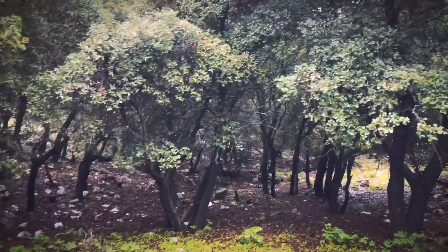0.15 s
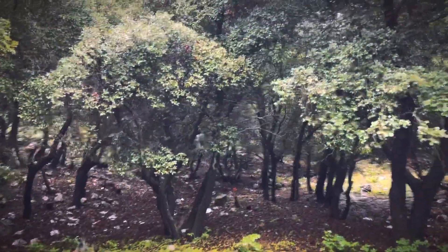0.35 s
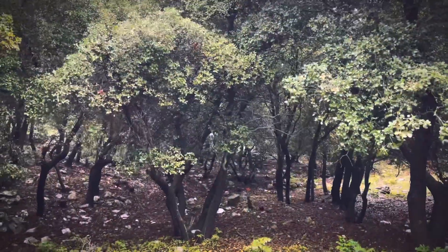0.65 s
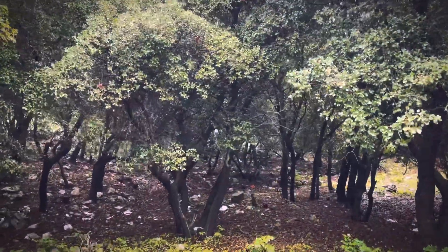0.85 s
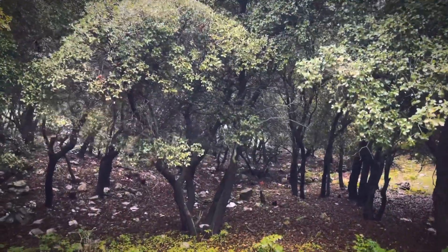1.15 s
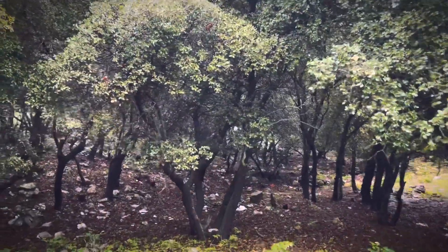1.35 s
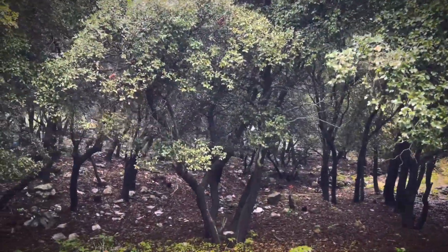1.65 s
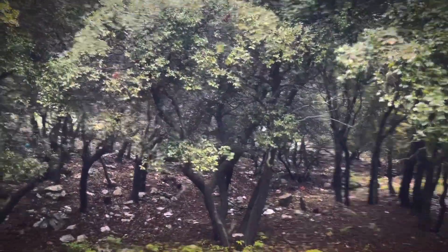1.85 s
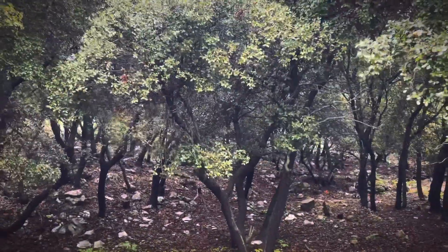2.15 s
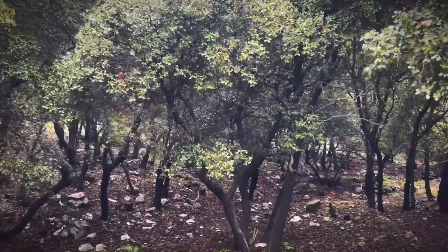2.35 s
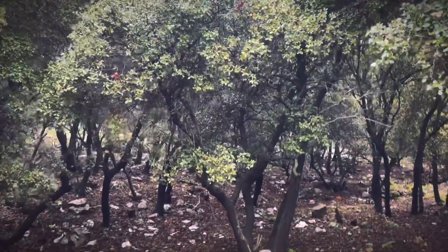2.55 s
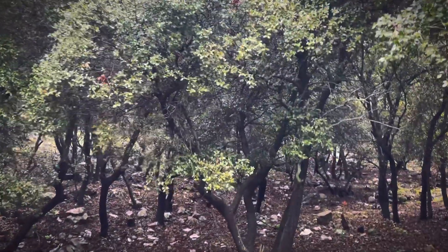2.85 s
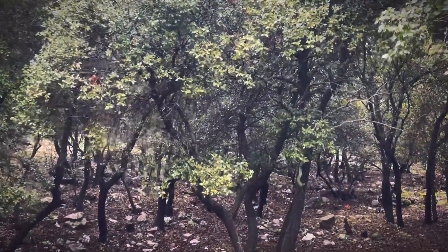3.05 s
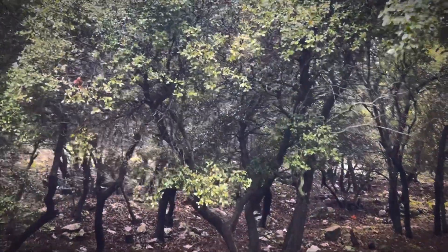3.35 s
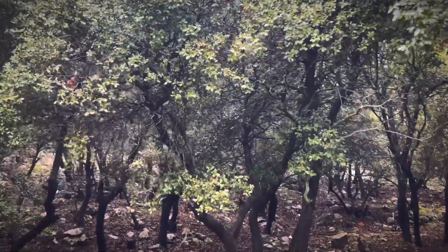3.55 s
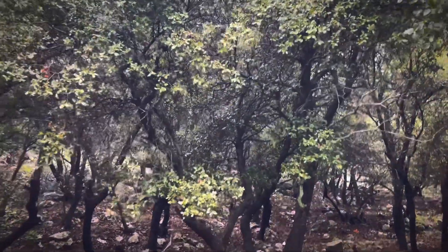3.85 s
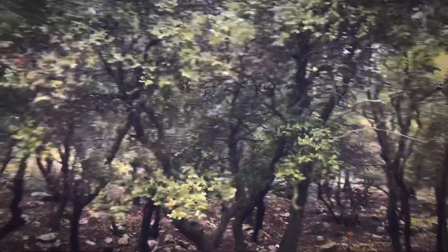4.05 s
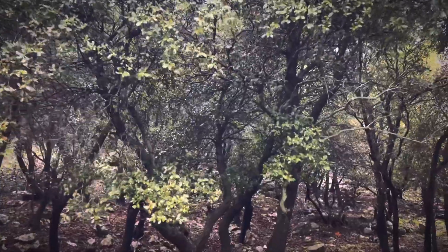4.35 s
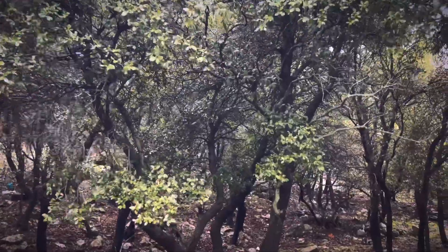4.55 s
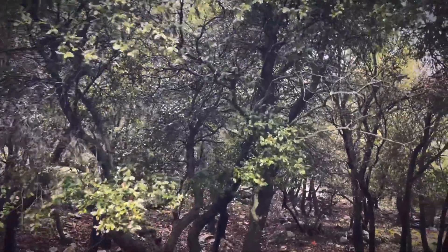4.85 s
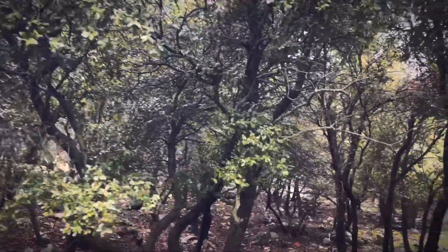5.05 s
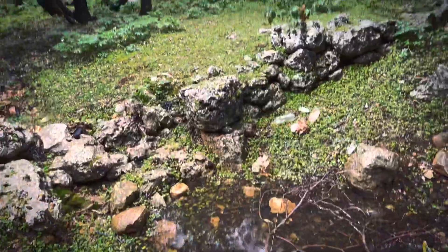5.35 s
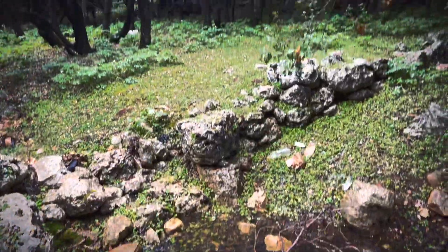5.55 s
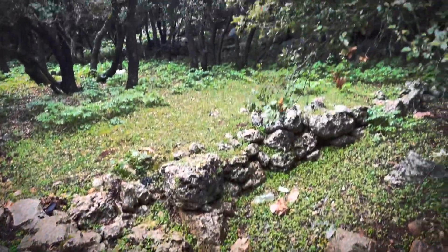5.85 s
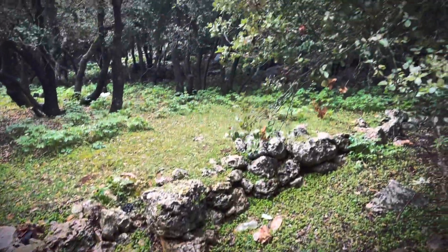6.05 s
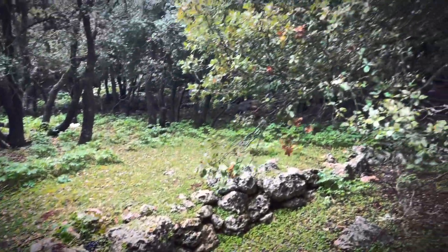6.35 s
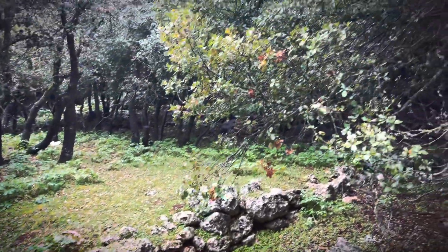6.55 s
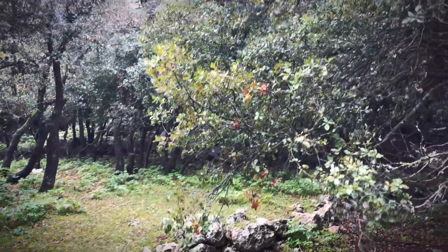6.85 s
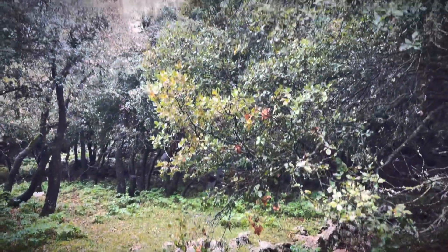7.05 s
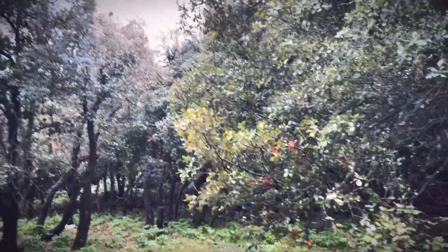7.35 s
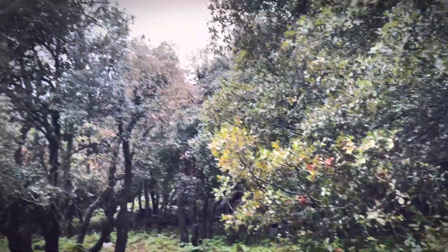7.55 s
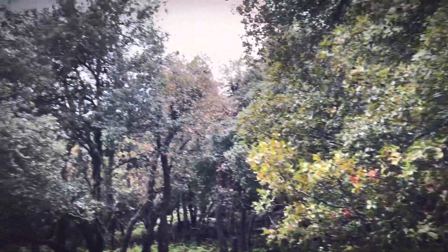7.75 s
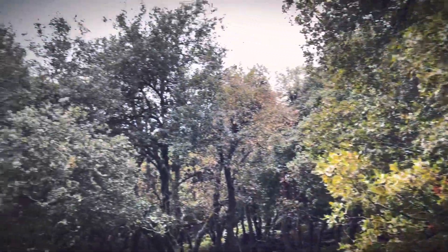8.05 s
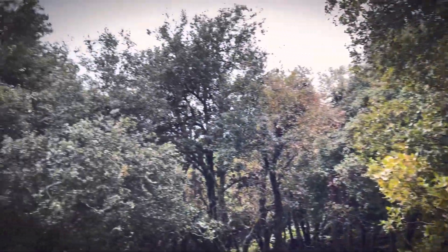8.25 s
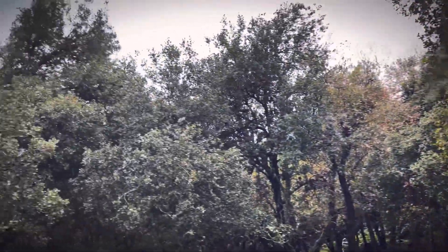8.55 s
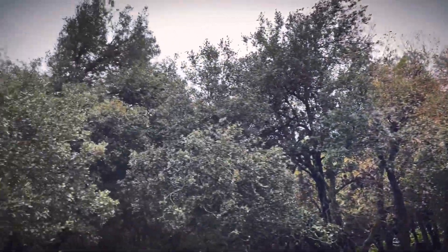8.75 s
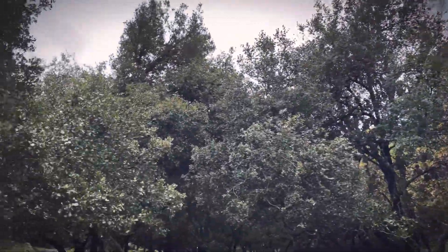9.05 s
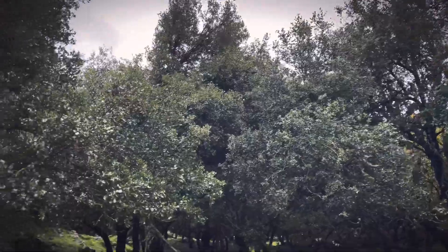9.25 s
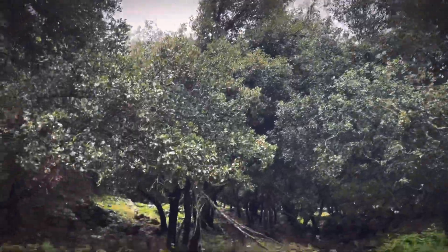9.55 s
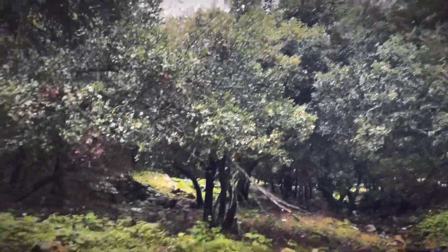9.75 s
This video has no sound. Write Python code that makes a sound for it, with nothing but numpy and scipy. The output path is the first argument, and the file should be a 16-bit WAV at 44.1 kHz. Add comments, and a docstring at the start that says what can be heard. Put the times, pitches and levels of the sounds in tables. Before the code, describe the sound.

Light rain in a wood, heard close from a hand-held microphone. A patchy, bright hiss on leaves runs throughout, grained with small drops and crisp near ticks. Very thin, high bird notes chirp in the first 0.3 s. Heavy drips hit the microphone housing as short, hollow, damped thumps around 0.2-0.4, 0.9 and 1.9 s, strongest near 2.45, 3.3 and 4.15 s, with spatter and low grip rumble, notably at 4.1 s. Bright wet plops sound near 4.95 s. At 5.23 s everything drops out for an instant. From 5.5 to 6.5 s a near bird, left of centre, gives mellow sliding whistles with a tiny trill, echoing softly off trunks. More thumps come at 6.75-7.25 s. From 6.6 s to the end, fainter higher birds twitter in quick rising and falling slurs, with a few hoarse chirrups before 7.1 s. The rain thins; a last cluster of weaker drips falls near 9.6 s.

```python
"""Light rain in an oak wood: heavy drips excite the damped modes of a hand-held microphone housing,
near drops tick as splash plus resonance, and countless far drops merge into a hiss of filtered noise.
The housing hums under drizzle and rumbles in the grip. Birds, sung as gliding sines left of centre
or in the centre, return from the trunks as diffuse echoes; hazy narrow bands of noise swell and fade.
The sound drops out for a moment in the middle."""
import sys
import numpy as np
from scipy import signal
from scipy.fft import rfft, irfft
from scipy.io import wavfile

SR = 44100
rng = np.random.default_rng(int(sys.argv[2]) if len(sys.argv) > 2 else 0)


def wav_out(sig):
    """Save sig, one row per channel (or a flat mono array), as 16-bit PCM at SR to the path in sys.argv[1]."""
    wavfile.write(sys.argv[1], SR, np.round(np.clip(np.atleast_2d(sig).T, -1, 1) * 32767).astype(np.int16))


N = 436590

# Course of the rain. Each row: time in seconds, mean hum of the housing in dB, rain on leaves in dB.
RAIN_COURSE = [(0.0, -61.5, -54.5), (.38, -62.5, -61), (.46, -62.5, -56.5), (1.0, -65, -57),
               (1.68, -66.5, -59), (1.98, -60.5, -55.5), (2.2, -59, -57.5), (2.95, -66.5, -57),
               (3.4, -63.5, -57), (4.08, -60, -58.5), (4.44, -64.5, -60.5), (4.57, -73, -57),
               (4.66, -58.5, -54.5), (5.3, -64.5, -60.5), (5.8, -64, -60.5), (6.3, -57, -59),
               (7.0, -66.5, -63), (7.5, -78.5, -64.5), (8.24, -67, -63), (8.9, -72.5, -61.5),
               (9.9, -65.5, -63)]
# Rumble of the grip. Each row: time in seconds, mean level in dB.
GRIP_COURSE = [(0.0, -80.5), (.33, -58), (.69, -74.5), (1.0, -76.5), (1.71, -77.5), (1.98, -71.5),
               (2.65, -62.5), (3.1, -83), (3.3, -62), (3.69, -82.5), (4.08, -50), (4.44, -73.5),
               (6.4, -67.5), (7.05, -57.5), (7.42, -82), (9.68, -78)]
# Spectra of rain on leaves as the microphone colours it, of the housing's hum and of the grip's rumble.
# Each row: frequency in Hz, relative density in dB.
HISS_SPECTRUM = [(880, -44), (1500, -3.5), (3120, -4.5), (5070, -1.5), (5600, -12.5), (6000, -4),
                 (6560, -2), (7460, -7.5), (9100, -10), (11800, 4), (14100, -12), (14900, -15.5),
                 (16000, -48)]
HUM_SPECTRUM = [(71, -47), (120, -27), (220, -32), (300, 1.5), (653, 3.5), (773, 12.5), (955, 10.5),
                (1150, 5.5), (3500, -6.5), (4550, -14), (7700, -120)]
RUMBLE_SPECTRUM = [(12, -58), (20, -44), (43, 7), (91, 10), (130, 2.5), (216, 6), (300, -3), (390, -20),
                   (660, -120)]
# Heavy drips on the housing. Each row: start in seconds, level in dB before the mode gains,
# favoured pitch in octaves above the lowest mode.
KNOCKS = [(.215, -28.5, 2.1), (0.286, -37, 2.7), (0.368, -25.5, 1.87), (.792, -36, 0.91), (0.9, -25, 2.15),
          (0.935, -20, 0.86), (1.046, -37.5, .05), (1.84, -28.5, 1.95), (1.875, -27, 1.04),
          (1.931, -30, 2.07), (2.387, -29.5, 1.3), (2.431, -21, 2.17), (2.454, -8.5, 2.3),
          (2.607, -26.5, 0.78), (2.639, -30, 2.5), (2.685, -30.5, 2.13), (2.742, -37, 0.045),
          (2.816, -34, 2.7), (3.29, -27.5, 1.87), (3.315, -7, 2.16), (3.839, -30, 1.9), (3.943, -28, 2.03),
          (4.127, -21.5, 0.13), (4.15, -9, 2.6), (4.22, -18.5, 1.15), (4.774, -32.5, 0.91),
          (5.006, -38, 0.06), (5.275, -41.5, 0.82), (5.319, -41, 0.6), (6.244, -30, 1.25),
          (6.555, -25, 1.86), (6.748, -16.5, 2.02), (6.79, -25.5, 1.93), (6.817, -17.5, 1.43),
          (7.077, -9, 1.69), (7.21, -28, 2.4), (7.25, -13.5, 2.11), (7.506, -29.5, 1.76),
          (7.603, -38, 1.76), (8.547, -25.5, 1.77), (9.529, -35.5, 2.7), (9.541, -27, 1.83),
          (9.562, -30, 1.9), (9.607, -20, 1.98), (9.668, -43, 1.2), (9.777, -45, 0.81)]
# Modes of the housing. Each row: mean frequency in Hz, relative level in dB, decay by 60 dB in seconds.
HOUSING_MODES = [(140.2, -0.5, 0.07), (220.4, -1.75, 0.069), (304, -4, 0.032), (404, -1.6, 0.042),
                 (515.6, -5.5, 0.029), (770, -3, 0.028), (921, 0.5, 0.04), (1250, 0, 0.024)]
# Near drops on leaves and stones. Each row: start in seconds, peak of the ring in dB, pitch in Hz.
TICKS = [(.088, -56, 3700), (.133, -62, 4280), (0.169, -48, 9700), (0.3394, -55, 4840), (0.427, -37, 10900),
         (0.505, -47, 4760), (0.68, -42, 12700), (0.743, -49, 1940), (.812, -58, 1400), (0.903, -41, 1850),
         (1.0634, -41, 1250), (1.08, -54, 1500), (1.119, -45, 1310), (1.224, -51, 1250), (1.332, -46, 5170),
         (1.332, -48, 2000), (1.389, -45, 11800), (1.4327, -36.5, 1300), (1.481, -38.5, 12700),
         (1.9638, -52, 11300), (2.365, -36.5, 12300), (2.493, -39, 10800), (2.573, -28, 1560),
         (2.598, -30.5, 1350), (2.679, -42, 1510), (2.722, -40, 3570), (3.344, -34, 1590),
         (3.5169, -38.5, 3220), (3.523, -38, 3660), (3.7488, -37, 6440), (3.934, -40.5, 1220),
         (4.122, -51, 5000), (4.153, -28.5, 1550), (4.206, -39, 1580), (4.2287, -35.5, 1450),
         (4.3, -37.5, 1440), (4.3999, -36.5, 1380), (4.436, -51, 4700), (4.621, -57, 11400),
         (4.769, -35, 2000), (4.862, -47, 1420), (4.8945, -35.5, 3800), (4.917, -40, 11400),
         (4.957, -25, 2710), (4.96, -23.5, 1275), (5.123, -50, 11000), (5.466, -40, 12600),
         (6.3634, -30, 4300), (6.54, -45, 6640), (6.747, -49, 2870), (6.817, -51, 4950), (7.216, -52, 4900),
         (7.5052, -56, 2830), (7.7321, -39.5, 4480), (7.734, -48, 3270), (7.972, -58, 4100),
         (8.363, -54, 4500), (8.544, -44, 3900), (8.757, -58, 5260), (8.825, -55, 4900),
         (9.6045, -45, 2040)]
# Crackle of water shaken from a branch. Each row: middle in seconds, length in seconds, level in dB.
FLURRIES = [(0.336, 0.099, -58), (1.137, 0.31, -63.5), (1.452, 0.13, -65.5), (1.898, 0.22, -56),
            (2.644, 0.29, -61), (3.927, 0.24, -58.5), (4.267, 0.14, -53), (9.557, 0.083, -63.5)]
# Notes of the near bird. Each row: start in seconds, length in seconds, initial offset of the slide in Hz,
# first pitch in Hz, last pitch in Hz, level in dB before shaping and flutter.
NEAR_BIRD_NOTES = [(5.476, .064, -200, 2270, 2250, -56), (5.606, 0.032, -49, 1700, 1820, -56.5),
                   (5.652, 0.056, -27, 1550, 1830, -49), (5.697, 0.033, -250, 2148, 2110, -35),
                   (5.825, 0.12, 178, 1792, 1618, -41), (6.037, 0.0615, 475, 1856, 2010, -40),
                   (6.168, 0.12, 338, 2006, 1937, -40), (6.443, 0.073, -22, 2100, 2420, -57.5)]
# Notes of further birds. Each row: start in seconds, length in seconds, first pitch in Hz,
# last pitch in Hz, level in dB before shaping and flutter.
SONG_NOTES = [(5.55, 0.043, 3820, 3920, -73), (5.76, 0.052, 3900, 3950, -72),
              (6.58, 0.048, 3660, 3600, -73), (6.624, 0.028, 3450, 3080, -73),
              (6.689, 0.06, 3430, 4680, -64), (6.847, 0.012, 4600, 4620, -67),
              (6.889, 0.027, 4030, 3925, -64), (6.9, 0.019, 3880, 2940, -67),
              (6.955, 0.012, 4600, 4570, -66), (6.99, 0.02, 5800, 5780, -72),
              (6.999, 0.038, 3930, 3330, -67), (7.043, 0.014, 4100, 5000, -66),
              (7.133, 0.037, 5060, 5200, -74), (7.136, 0.029, 2780, 3390, -72),
              (7.203, 0.1, 4190, 3710, -66.5), (7.378, 0.034, 3380, 3440, -72),
              (7.534, 0.037, 5200, 5400, -73), (7.62, 0.027, 4350, 4140, -75),
              (7.657, 0.017, 4250, 4300, -74.5), (7.675, 0.02, 3380, 3400, -73),
              (7.697, 0.031, 3980, 4090, -70.5), (7.851, 0.054, 3960, 3920, -77),
              (7.876, 0.062, 4350, 5200, -74), (8.031, 0.084, 3890, 5080, -69.5),
              (8.215, 0.041, 4440, 3450, -73), (8.37, 0.044, 4420, 3510, -66),
              (8.506, 0.105, 3220, 4600, -68), (8.528, 0.17, 3920, 3920, -72),
              (8.702, 0.09, 3500, 4650, -63), (8.869, 0.065, 3600, 3130, -67),
              (8.934, .21, 3940, 3920, -69.5), (8.951, 0.018, 4850, 4400, -65),
              (9.047, 0.056, 3590, 3130, -63.5), (9.109, 0.027, 5550, 5500, -75),
              (9.292, 0.049, 3440, 3680, -61.5), (9.388, 0.075, 4044, 3980, -72),
              (9.49, 0.049, 3610, 3020, -67), (9.78, 0.23, 3940, 4000, -70.5)]
# Notes of a thin high bird. Each row: start in seconds, length in seconds, first, middle and last pitch
# in Hz, level in dB before flutter.
HIGH_BIRD_NOTES = [(0.011, 0.031, 6850, 7800, 6950, -64), (.06, 0.018, 6900, 7050, 7200, -72),
                   (0.126, 0.062, 7000, 5920, 4840, -59.5), (0.212, 0.034, 6400, 7900, 7040, -60),
                   (.263, 0.016, 7120, 7170, 7240, -62.5)]
# Short hoarse chirrups. Each row: start in seconds, length in seconds, central pitch in Hz,
# level in dB before flutter.
CHIRRUPS = [(5.568, 0.022, 2860, -62), (5.801, 0.013, 2690, -54.5), (6.774, 0.024, 2840, -57.5),
            (7.057, 0.017, 2760, -55)]
# Hazy narrow bands of sound, distant calls or lingering echo. Each row: middle in seconds,
# length in seconds, pitch in Hz, peak level in dB.
HAZES = [(5.57, 0.21, 2180, -64), (6.66, 0.22, 1670, -56.5), (7.974, 0.34, 1596, -60.5)]

NEAR_BIRD_PAN_DB, SONG_PAN_DB = 7.5, 7   # left above right
WOOD_T60_S, NEAR_ECHO_DB = 0.5, -8
TWIGS_T60_S, TWIGS_DB = 0.08, -1   # near twigs smear the further voices
THIN_T60_S = 0.36   # high voices die sooner among the leaves
SONG_ECHO_DB, HIGH_ECHO_DB, CHIRRUP_ECHO_DB = -1.5, 1.5, -9
SLIDE_S, ATTACK_S, RELEASE_S = 0.0131, 0.011, 0.008   # slide is a time constant
TRILL_S, PIP_GAP_S, PIP_S = 5.754, 0.019, 0.016   # start, spacing of starts, length
TRILL_HZ, TRILL_SAG_HZ, TRILL_DB = 2010, 22, -42   # four pips, each lower
HIGHER_LOUDER_DB = 1.5   # per kHz within a note
GLIDE_DIP_DB, DWELL = 3.0, 0.17   # dip at mid-note per kHz of glide; share of the note held at each end
SPLASH_DB, SPLASH_FOLLOWS = -19, 0.5   # splash peak, and how much of the drop's level it follows
FALL_BELOW_DB, FALL_ABOVE_DB = 15, 13   # per octave: modes off the favoured pitch ring weaker
MOST_FALL_DB = 21   # limit of that weakening
UNEVEN_DB = 1.5   # chance in the strength of each mode
DROPOUT_S, DROPOUT_WIDTH_S, DROPOUT_DB = 5.232, 0.012, 43   # middle, half width, depth
CUTOFF_HZ = 16300


def from_db(db):
    """A level in dB is the logarithm of an amplitude ratio."""
    return 10 ** (np.asarray(db) / 20)


def rms_one(x):
    """Normalisation to unit root mean square."""
    return x / np.sqrt(np.mean(x ** 2) + 1e-20)


def in_time(rows):
    """Linear interpolation carries each column through time."""
    s, *columns = np.transpose(rows)
    return [np.interp(np.arange(N) / SR, s, c) for c in columns]


def drift(rate):
    """Low-passed noise: slow chance with spread 1, quicker for a higher rate in Hz."""
    r = np.exp(-80 * np.pi * rate / SR)   # one step spans 40 samples
    noise = rng.standard_normal(N // 40 + 2002)
    slow = signal.lfilter([1], [1, -2 * r, r * r], noise)[2000:]
    return np.interp(np.arange(N) / 40, np.arange(len(slow)), rms_one(slow))


def coloured(x, spectrum):
    """Spectral weighting: multiplication by gains in the frequency domain; rms 1."""
    hz, db = np.transpose(spectrum)
    grid = np.arange(N // 2 + 1) * SR / N + 1
    gain = from_db(np.interp(np.log(grid), np.log(hz), db))
    return rms_one(irfft(rfft(x) * gain, N))


def ring(clicks, hz, t60):
    """Damped resonance: a unit click sets a decaying sine of height 1 ringing."""
    r = from_db(-60 / (t60 * SR))
    w = 2 * np.pi * min(hz, 0.45 * SR) / SR
    return signal.lfilter([0, np.sin(w)], [1, -2 * r * np.cos(w), r * r], clicks + 1e-18)


def add(track, s, sound):
    """Superposition: a short sound joins the track at its time."""
    i = max(round(s * SR), 0)
    track[..., i:i + sound.shape[-1]] += sound[..., :N - i]


def whistle(t, hz, level_db, pan_db):
    """Phase is the integral of frequency: a near-sine note with soft ends, panned by level."""
    fade = np.clip(np.minimum(t - t[0], t[-1] - t) / 0.00033, 0, 1)
    note = np.sqrt(2) * from_db(level_db) * fade * np.sin(2 * np.pi * np.cumsum(hz) / SR)
    sides = from_db([[pan_db / 2], [-pan_db / 2]])
    return note * sides / np.cosh(pan_db * np.log(10) / 40)


def wood(x, t60):
    """Diffuse reverberation: trunks scatter the song back as a tail, different on each side."""
    t = np.arange(SR) / SR
    tail = rng.standard_normal((2, SR)) * from_db(-60 * t / t60) * (t > 0.008)
    return signal.fftconvolve(x, rms_one(tail) / np.sqrt(SR), axes=1)[:, :N]


def hazes():
    """Narrow-band noise: a band swells and fades, like a blurred call or the haze of an echo."""
    t, noise = np.arange(N) / SR, rng.standard_normal(N)
    out = np.zeros(N)
    for middle, length, hz, db in HAZES:
        swell = np.exp(-((t - middle) / length * 2) ** 2)
        out += from_db(db) * swell * rms_one(ring(noise, hz, 0.017))
    return out


def song():
    """Frequency glide: further notes dwell, slur unsteadily and dwell again; leaves break them up."""
    out, waver = np.zeros((2, N)), drift(300)
    for s, length, first, last, db in SONG_NOTES:
        t = np.arange(0, length, 1 / SR)
        slur = np.clip((t / length - DWELL) / (1 - 2 * DWELL), 0, 1)
        hz = first + (last - first) * slur
        glide_khz = abs(last - first) / 1000
        tilt_db = HIGHER_LOUDER_DB * (hz - (first + last) / 2) / 1000
        dip_db = GLIDE_DIP_DB * glide_khz * np.sin(np.pi * slur)
        unsteady = waver[int(s * SR) + np.arange(len(t)) - len(t)]
        wavering = hz * (1 + (0.002 + 0.016 * glide_khz) * unsteady)
        add(out, s, from_db(tilt_db - dip_db) * whistle(t, wavering, db, SONG_PAN_DB))
    return out * from_db(3 * drift(90))


def high_bird():
    """Curved frequency path: notes arch or plunge, bent smoothly by the middle pitch."""
    out = np.zeros((2, N))
    for s, length, first, middle, last, db in HIGH_BIRD_NOTES:
        t = np.arange(0, length, 1 / SR)
        early = (t / length) ** 0.75   # brings the top of the arch forward
        arch = 4 * early * (1 - early)
        hz = first + (last - first) * t / length + (middle - (first + last) / 2) * arch
        add(out, s, whistle(t, hz, db, SONG_PAN_DB))
    return out * from_db(3.6 * drift(60))


def chirrups():
    """Frequency modulation: a fast wide warble makes these central notes hoarse."""
    out = np.zeros((2, N))
    for s, length, hz, db in CHIRRUPS:
        t = np.arange(0, length, 1 / SR)
        warble = 0.1 * np.cos(2 * np.pi * 55 * t)
        scoop = 0.17 * np.exp(-t / 0.0022)   # a low start
        add(out, s, whistle(t, hz * (1 - warble - scoop), db, 0))
    return out * from_db(3.8 * drift(180))


def near_bird():
    """Exponential approach: notes slide onto a straight glide; a short trill joins the rise to the fall."""
    out = np.zeros((2, N))
    pips = []
    for k in range(4):
        pip_hz = TRILL_HZ - k * TRILL_SAG_HZ
        pips.append((TRILL_S + k * PIP_GAP_S, PIP_S, 0, pip_hz, pip_hz, TRILL_DB))
    for s, length, slide_hz, first, last, db in NEAR_BIRD_NOTES + pips:
        t = np.arange(0, length, 1 / SR)
        hz = first + (last - first) * t / length + slide_hz * np.exp(-t / SLIDE_S)
        attack = t / min(ATTACK_S, length / 2)
        release = (length - t) / min(RELEASE_S, length / 2)
        shape = np.clip(np.minimum(attack, release), 0, 1)
        add(out, s, shape * whistle(t, hz, db, NEAR_BIRD_PAN_DB))
    out[1] = np.roll(out[1], 3)   # the sound reaches the right side 3 samples later
    return out * from_db(0.86 * drift(46))


def birds():
    """Direct and reverberant sound add up; moving leaves blur the echoes of the further birds."""
    near, further, high, hoarse = near_bird(), song(), high_bird(), chirrups()
    thin = from_db(SONG_ECHO_DB) * further + from_db(HIGH_ECHO_DB) * high
    blurred = wood(thin, THIN_T60_S)
    # a single tail, [0], is heard alike on both sides
    blurred = blurred + from_db(CHIRRUP_ECHO_DB) * wood(hoarse, THIN_T60_S)[0]
    blurred = blurred + from_db(TWIGS_DB) * wood(further + hoarse, TWIGS_T60_S)[0]
    echo = from_db(NEAR_ECHO_DB) * wood(near, WOOD_T60_S) + blurred * from_db(3 * drift(90))
    return near + further + high + hoarse + echo + hazes()


def grip(level_db):
    """Friction noise: the hand shifts on the housing, heard as lumpy low noise."""
    return from_db(level_db + 5.3 * drift(10.3)) * coloured(rng.standard_normal(N), RUMBLE_SPECTRUM)


def drops(per_s, spread_db, low_hz, high_hz, cycles, largest):
    """Random impacts of uneven size: each swells and rings a few cycles at one of sixteen pitches."""
    sizes = from_db(spread_db * np.minimum(rng.exponential(1, N), largest)) * rng.choice([-1, 1], N)
    landed = sizes * (rng.random(N) < per_s / SR)
    dealt = rng.integers(0, 16, N)
    out = np.zeros(N)
    for k, hz in enumerate(np.geomspace(low_hz, high_hz, 16)):
        swelling = ring(landed * (dealt == k), hz, cycles / hz)
        out += rms_one(ring(swelling, hz, 0.53 * cycles / hz))   # two resonances in a row
    return rms_one(out)


def patches(swell_db):
    """Independent band modulation: bands of white noise swell and sink each on their own."""
    edges = np.geomspace(800, 17000, 10)
    white = rng.standard_normal((2, N))
    out = np.zeros(N)
    for k, band in enumerate(zip(edges, edges[1:])):
        sos = signal.butter(2, band, "band", fs=SR, output="sos")
        # neighbouring bands draw on different noise
        out += from_db(swell_db * drift(17.5)) * signal.sosfilt(sos, white[k % 2])
    return rms_one(out)


def spray():
    """Exponential settling: each bright splash leaves a fine spray that raises the gain of the hiss."""
    thrown = np.zeros(N)
    for s, db, hz in TICKS:
        add(thrown, s, np.array([from_db(db + 34) * (hz > 9000)]))
    return 1 + signal.lfilter([1], [1, -np.exp(-1 / (0.064 * SR))], thrown)


def leaves(level_db):
    """Incoherent summation: countless far drops merge to a patchy hiss; nearer ones stand out as grains."""
    far = patches(swell_db=1.6) * spray() * from_db(1.3 * drift(4) + 1.4 * drift(14))
    near = drops(500 * from_db(3.4 * drift(5)), 5.7, 5200, 17000, cycles=6.0, largest=4.6)
    near_db = -4.0 + 0.34 * (level_db - level_db.mean())   # heavier rain is grainier
    return from_db(level_db) * coloured(far + from_db(near_db) * near, HISS_SPECTRUM)


def spatter():
    """Exponential decay of a rate: each knock shakes loose extra drops per second, thinning out after it."""
    shaken = np.zeros(N)
    for s, db, _ in KNOCKS:
        add(shaken, s, np.array([from_db(0.46 * (db + 18.5))]))
    return 900 * signal.lfilter([1], [1, -np.exp(-1 / (0.09 * SR))], shaken)


def patter(hum_db, rain_db):
    """Forced vibration: the housing hums under fine drizzle, and small drops tap it in uneven flurries."""
    uneven_db = 2.5 * drift(8) + 3 * drift(50)
    hum = from_db(hum_db + uneven_db) * coloured(rng.standard_normal(N), HUM_SPECTRUM)
    per_s = 100 * from_db(5.4 * drift(6)) + spatter()
    taps = drops(per_s, 4.5, 350, 3800, cycles=7.0, largest=4.0)
    # a soft low wash that never stops
    still = from_db(-81.5) * rms_one(ring(rng.standard_normal(N), 257, 0.015))
    return still + hum + from_db(rain_db - 12.0) * taps


def flurries():
    """Clustered impacts: water shaken from a branch crackles densely, swells and thins out again."""
    t = np.arange(N) / SR
    gain = np.zeros(N)
    for middle, length, db in FLURRIES:
        gain += from_db(db) * np.exp(-((t - middle) / length * 2) ** 4)
    return gain * drops(700, 5.4, 700, 2000, cycles=9.0, largest=2.8)


def ticks():
    """Impact excitation: each near drop is a broad splash with a short ring at the pitch of what it hits."""
    out, t = np.zeros(N), np.arange(SR // 25) / SR
    bursts = rng.standard_normal((len(TICKS), len(t)))
    for (s, db, hz), burst in zip(TICKS, bursts):
        splash = np.gradient(ring(burst * from_db(-60 * t / 0.043), 0.99 * hz, 10.5 / hz))
        contact = burst * from_db(-60 * t / 0.007)
        rung = ring(ring(contact, hz, 7 / hz + 0.0054), hz, 4.4 / hz)
        splash_gain = from_db(SPLASH_DB + SPLASH_FOLLOWS * db)
        add(out, s, splash_gain * splash / np.abs(splash).max() + from_db(db) * rung / np.abs(rung).max())
    return out


def knocks():
    """Modal excitation: a drip spreads for a few milliseconds, so the modes swell before they die."""
    out, t = np.zeros(N), np.arange(SR // 5) / SR
    chance = rng.standard_normal((len(KNOCKS), len(HOUSING_MODES), 2))
    cracks = rng.standard_normal((len(KNOCKS), SR // 100)) * from_db(-60 * t[:SR // 100] / 0.0055)
    for (s, db, favoured), draws, crack in zip(KNOCKS, chance, cracks):
        first_touch = rms_one(ring(crack, 2400, 0.0001))
        add(out, s, from_db(0.3 * db - 53.0) * first_touch)
        for (hz, mode_db, t60), (detune, strength) in zip(HOUSING_MODES, draws):
            swell = (1 - np.exp(-(t / 0.0051) ** 2)) * from_db(-60 * t / t60)
            away = np.log2(hz / HOUSING_MODES[0][0]) - favoured   # octaves
            fall_db = min(max(FALL_ABOVE_DB * away, -FALL_BELOW_DB * away), MOST_FALL_DB)
            gain = from_db(db - fall_db + mode_db + UNEVEN_DB * strength)
            add(out, s, gain * swell * np.sin(2 * np.pi * hz * (1 + 0.03 * detune) * t))
    return out


def scene():
    """Superposition of all sources: rain, knocks and rumble sit in the centre, the birds are in stereo."""
    (grip_db,), (hum_db, leaves_db) = in_time(GRIP_COURSE), in_time(RAIN_COURSE)
    housing = grip(grip_db) + patter(hum_db, leaves_db)
    rain = leaves(leaves_db) + flurries() + knocks() + ticks()
    return housing + rain + birds()


def record(dry):
    """Gain modulation and low-pass filtering: the sound drops out briefly; the top is cut."""
    t = np.arange(N) / SR
    dip_db = DROPOUT_DB * np.exp(-((t - DROPOUT_S) / DROPOUT_WIDTH_S) ** 2)
    low_pass = signal.cheby2(12, 70, CUTOFF_HZ, fs=SR, output="sos")
    return signal.sosfilt(low_pass, dry * from_db(-dip_db))


dry = scene()
out = record(dry)
wav_out(out)
```